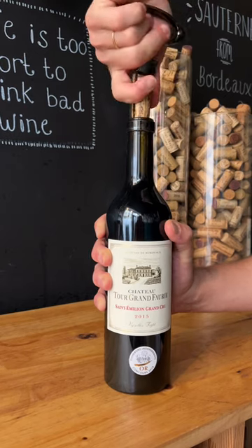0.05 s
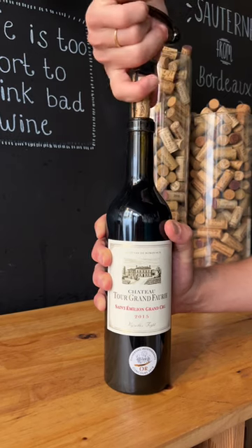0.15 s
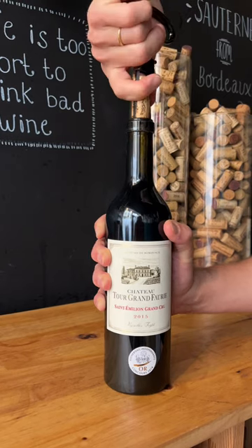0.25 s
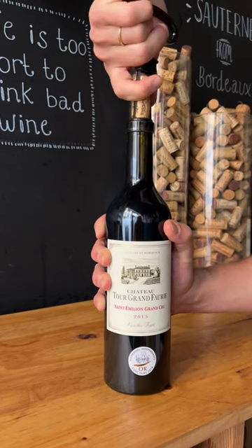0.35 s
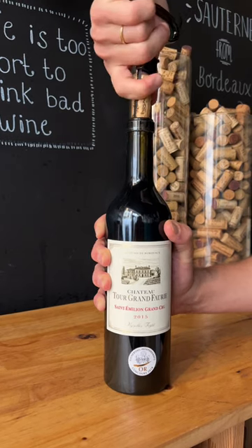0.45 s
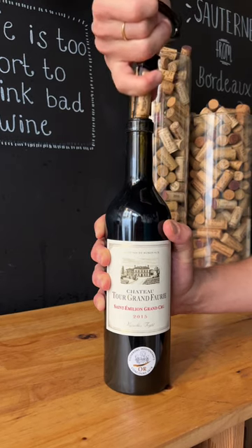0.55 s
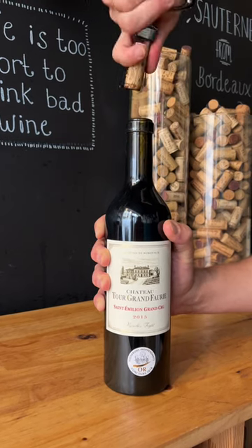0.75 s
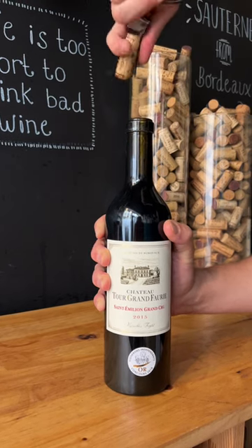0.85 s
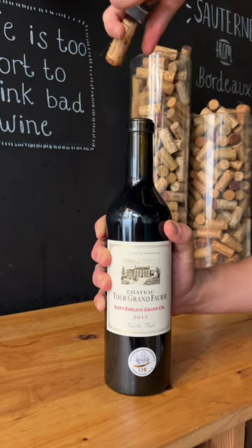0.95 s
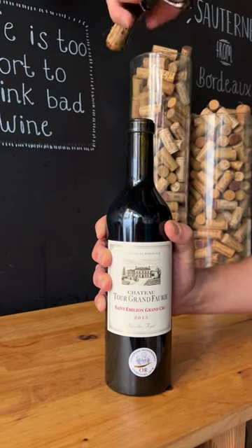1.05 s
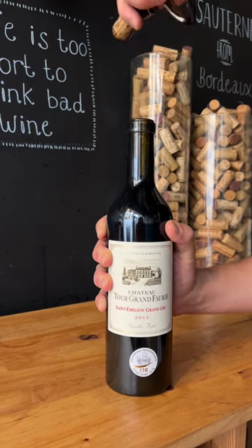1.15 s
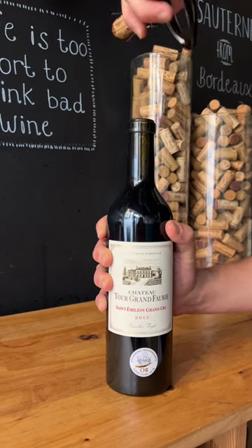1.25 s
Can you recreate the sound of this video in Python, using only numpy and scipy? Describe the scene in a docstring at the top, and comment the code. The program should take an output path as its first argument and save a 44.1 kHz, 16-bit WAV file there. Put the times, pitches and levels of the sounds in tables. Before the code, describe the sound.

A cork pops from a wine bottle at about 0.2 seconds, with a sharp corkscrew crack, a hollow note from the neck and a thump on the table. Near 0.6 seconds it comes free with a light scrape, a second snap and a smaller rising pop. Very faint hand rubs and rings of glass and steel follow until about 1.2 seconds, over a quiet room's low rumble.

```python
"""In a quiet, hard-walled room, a cork is levered out of a wine bottle on a wooden table.
The cork gives with a thump of the bottle, a crack of the steel corkscrew and a hollow pop of air
rushing into the neck. A third of a second later it leaves the neck with a scrape, a rising pop
and a second snap. Faint rubs of the hand and rings of glass and steel follow, over a low rumble."""
import sys
import numpy as np
from scipy import signal
from scipy.fft import rfft, irfft
from scipy.io import wavfile
from scipy.ndimage import uniform_filter1d

SR = 44100
rng = np.random.default_rng(int(sys.argv[2]) if len(sys.argv) > 2 else 0)


def persist_wave(psi):
    """Save psi, clipped to +-1, as 16-bit WAV."""
    counts = np.round(np.clip(psi, -1, 1) * 32767).astype(np.int16)
    wavfile.write(sys.argv[1], SR, np.atleast_2d(counts).T)


N = 57330
T = np.arange(N) / SR


def amp(db):
    """Turns decibels into a number to multiply by."""
    return 10 ** (np.asarray(db) / 20)


def unit(x):
    """Scales a signal to an average strength (rms) of 1."""
    return x / np.sqrt(np.mean(x ** 2) + 1e-20)


def read(points, hz):
    """Looks up values between a table's rows, with pitch spaced in octaves."""
    pitch_hz, value = np.transpose(points)
    return np.interp(np.log(hz + 1), np.log(pitch_hz + 1), value)


def pan(left_db):
    """Two gains that make the left side louder than the right by left_db."""
    return amp(np.array([[left_db], [-left_db]]) / 2)


def place(x, left_db, lag_s):
    """Puts a sound to the left: it reaches the right side softer and a little later."""
    return pan(left_db) * np.array([x, np.interp(T - lag_s, T, x)])


def noise(colour, tilt_db=0, likeness=0):
    """Coloured stereo noise, tilted by tilt_db per octave above 1000 Hz; likeness 1 makes it mono."""
    hz = np.fft.rfftfreq(N, 1 / SR)
    left, other = rfft(rng.standard_normal((2, N)))
    right = likeness * left + np.sqrt(1 - likeness ** 2) * other
    gain = amp(read(colour, hz) + tilt_db * np.log2(np.maximum(hz, 1000)))
    return unit(irfft(np.array([left, right]) * gain, N))


def wobble(samples):
    """A random wavering; smoothing over more samples makes it slower."""
    return unit(uniform_filter1d(rng.standard_normal(N), size=samples))


def struck(start, rise, fade, hold=0):
    """Loudness after a hit: it rises, and once the hold is over drops 60 dB every fade seconds."""
    return np.clip((T - start) / rise, 0, 1) * amp(-60 * np.maximum(T - start - hold, 0) / fade)


def note(start, hz, fade, rise):
    """One pure tone that dies away."""
    return struck(start, rise, fade) * np.sin(2 * np.pi * hz * (T - start))


def room_echo(x):
    """Hard walls smear a sound into a tail, strongest early on; each pitch dies at its own speed."""
    # time the echo takes to drop 60 dB: pitch_hz, fade_s
    fade_times = [(80, 0.83), (250, 0.71), (600, 0.46), (1500, 0.62), (4000, 0.49), (7500, 0.5),
                  (11000, 0.23), (16000, 0.31)]
    # colour of the echo on each side: pitch_hz, level_db
    left_colour = [(100, -7.5), (500, 0), (1500, -2), (3000, -2.5), (5500, 1), (8000, 2), (11000, -10.5),
                   (16000, 0)]
    right_colour = [(100, -0.5), (500, -6.5), (1500, -4), (3000, -4), (5500, -11), (8000, -3.5),
                    (11000, -6), (16000, -5)]
    onset_s, early_db, early_s = 0.0063, 6, 0.0067
    hz, t, bands = signal.stft(rng.standard_normal((2, N)), SR, nperseg=256)
    fade = read(fade_times, hz)[:, None]
    colour = amp([read(left_colour, hz), read(right_colour, hz)])[:, :, None]
    same_energy = np.sqrt(2 * np.log(1000) / (fade * SR))  # for long and short fades alike
    bands = bands * colour * amp(-60 * t / fade) * same_energy
    tail = signal.istft(bands, SR, nperseg=256)[1][:, :N]
    tail = tail * np.minimum(T / onset_s, 1) ** 2 * amp(early_db * np.exp(-T / early_s))
    return signal.fftconvolve(x[None], tail, axes=1)[:, :N]


def room_tone():
    """The room's low background rumble, gently wavering."""
    # colour of the rumble: pitch_hz, level_db
    colour = [(20, -30.5), (35, -11), (49, 8), (65, -2), (110, -3), (200, -10.5), (400, -16.5),
              (650, -22.5), (1000, -37), (1700, -32), (3000, -41.5), (6000, -40.5), (9000, -51.5),
              (16000, -53.5)]
    level_db, waver_db = -59.5, 1.46
    waver = unit(uniform_filter1d(wobble(2500), size=1500))
    return amp(level_db + waver_db * waver) * pan(4.5) * noise(colour, likeness=0.55)


def handling():
    """Hand and cork rub in short, grainy strokes, which share their echo with the faint tinks."""
    # strokes: start_s, length_s, level_db, pitch_hz, width_hz, hiss_db
    strokes = [(-.03, 0.11, -70, 1070, 1500, -12), (0.141, 0.022, -58.5, 585, 700, -40),
               (0.529, 0.058, -64, 1200, 1500, 1), (0.723, .07, -67.5, 780, 330, -23),
               (0.932, 0.07, -65, 1254, 1086, -6), (1.004, 0.053, -68, 1250, 1101, -3),
               (1.149, 0.017, -67, 1211, 1800, -14.5)]
    # colour of the rubbing hiss: pitch_hz, level_db
    hiss_colour = [(200, -4.5), (1000, 1.5), (2300, 4), (3500, -1), (5500, -1), (8000, -19.5),
                   (16000, -21.5)]
    graininess = 0.17
    rubs, all_hz = np.zeros((2, N)), np.fft.rfftfreq(N, 1 / SR)
    for start, length, db, hz, width, hiss_db in strokes:
        band = 1 / (1 + (2 * (all_hz - hz) / width) ** 2)
        scrape = unit(irfft(rfft(rng.standard_normal((2, N))) * band, N))
        grain = unit(np.exp(graininess * wobble(90)))
        stroke = np.sin(np.pi * np.clip((T - start) / length, 0, 1))
        rubs += amp(db) * stroke * grain * (scrape + amp(hiss_db) * noise(hiss_colour))
    ring = tinks()
    return rubs + ring + room_echo(amp(2) * rubs[0] + amp(-3) * ring)


def bottle_thumps():
    """The bottle jolts against the table and sets the room's low notes booming."""
    # jolts: start_s, level_db, pitch_hz, fade_s, boom_db (added to level_db)
    jolts = [(0.162, -45, 148, 0.18, -33), (0.2089, -24, 259, 0.04, -13.5), (0.2132, -28, 139, 0.083, -6.5),
             (0.23, -20.5, 150, 0.074, -30.5), (0.2452, -26.5, 149, 0.065, -19.5),
             (0.5689, -37, 147, 0.12, -12.5), (0.5879, -30, 157.4, 0.05, -48)]
    # low notes of the room, woken by each jolt: pitch_hz, level_db, fade_s
    room_notes = [(97, -2, .7), (118, 0, .45), (136, 0, .4), (168, -4, .3), (192, -2, .42), (220, -5, .4),
                  (266, -4, .42), (335, -13, .4)]
    # low room notes that swell at their own times: start_s, level_db, pitch_hz, rise_s, fade_s
    swells = [(-.02, -40, 98, 0.014, 0.52), (-.02, -46, 166.9, 0.079, 0.31),
              (0.28, -23.5, 110.3, 0.061, 0.23), (0.359, -45, 95.5, 0.01, 0.87),
              (0.632, -45.5, 99, 0.017, 0.24)]
    knock, boom = np.zeros(N), np.zeros(N)
    for start, db, hz, fade, boom_db in jolts:
        knock += amp(db) * note(start, hz, fade, rise=0.0012)
        for room_hz, room_db, room_fade in room_notes:
            boom += amp(db + boom_db + room_db) * note(start, room_hz, room_fade, rise=0.054)
    boom += sum(amp(db) * note(start, hz, fade, rise) for start, db, hz, rise, fade in swells)
    knock = signal.sosfilt(signal.butter(2, 80, "highpass", fs=SR, output="sos"), knock)
    placed = place(knock, left_db=5.5, lag_s=0.0007) + place(boom, left_db=7.5, lag_s=0.0007)
    return placed + amp(-4) * room_echo(knock)


def corkscrew_snaps():
    """The corkscrew snaps and the cork slips: bursts of noise that set wood, steel and glass ringing."""
    # snaps: start_s, level_db, rise_s, decay_s (to about a third), tilt_db_per_octave, left_db
    snaps = [(0.2009, -37, 0.0033, 0.01, -5.5, 2.5), (0.2159, -25.5, .0012, 0.0031, 8, -3.5),
             (0.2178, -18.5, .0008, 0.003, -2.5, 3), (.5585, -50, 0.0037, 0.0025, -3, 14),
             (.5634, -38.5, 0.0013, 0.003, -1, -1), (0.575, -45, 0.0013, 0.0055, -20, 0.5),
             (0.5807, -29.5, 0.00099, 0.0024, 0.5, -6.5), (.865, -86, .004, 0.015, 1, 8),
             (0.927, -66.5, 0.0045, 0.0076, -4.5, 5)]
    # colour of a snap: pitch_hz, level_db
    colour = [(40, -36), (150, -12), (350, -5), (700, -10.5), (1400, -5), (2100, -2), (3300, -5), (5500, 2),
              (8500, -4.5), (12000, -4), (16000, -11.5)]
    # notes of the wood, steel and glass: pitch_hz, level_db, fade_s
    ring_notes = [(364, -2, .22), (530, -7, .2), (715, -8, .12), (1285, -7, .2), (1879, -8, .22),
                  (2495, -1, .12), (2815, -6, .22), (2931, -1, .22), (3871, 0, .16), (4364, -7, .22),
                  (4790, -6, .2), (4941, -6, .22), (5220, -5, .28), (7697, -8, .28)]
    peak_limit, ring_db = 2.2, -25.5
    crack, ring = np.zeros((2, N)), np.zeros((2, N))
    for start, db, rise, decay, tilt_db, left_db in snaps:
        shape = np.clip((T - start) / rise, 0, 1) * np.exp(-np.maximum(T - start - rise, 0) / decay)
        burst = peak_limit * np.tanh(noise(colour, tilt_db) / peak_limit)
        crack += amp(db) * pan(left_db) * shape * burst
    crack = hollow_body(crack)
    for hz, note_db, fade in ring_notes:
        energy = sum((amp(db) * struck(start, rise, fade)) ** 2 for start, db, rise, *_ in snaps)
        tone = np.sin(2 * np.pi * (hz * T + rng.random((2, 1))))
        ring += amp(note_db + ring_db) * np.sqrt(energy) * tone
    return crack + pan(5) * ring + room_echo(crack[0] + 0.29 * ring[0])


def hollow_body(x):
    """Bottle and corkscrew boost a few pitches, which makes a snap sound hollow."""
    # boosted bands: pitch_hz, width_hz, gain
    bands = [(358, 40, 1.5), (530, 35, 1.0), (720, 50, .6), (2470, 100, 1.2), (2900, 170, 2.7),
             (3875, 90, 2.3)]
    return x + sum(gain * signal.lfilter(*signal.iirpeak(hz, hz / width, fs=SR), x)
                   for hz, width, gain in bands)


def air_pops():
    """Air rushes unevenly into the neck; its note rises as the opening clears, then rings on."""
    # pops: start_s, level_db, first_hz, last_hz, glide_s, rise_s, hold_s, fade_s, roughness (0 to 1)
    pops = [(.2045, -28, 870, 892, .004, .016, .047, .035, .2),
            (.5665, -45.5, 440, 1210, .007, .002, .02, .05, .6)]
    # notes that linger in the neck: start_s, level_db, pitch_hz, fade_s
    neck_notes = [(.215, -38, 884, .36), (.215, -43, 904, .38), (.575, -52, 912, .28),
                  (.578, -49, 1205, .28)]
    air, lag_s = np.zeros(N), 0.00017
    for start, db, first_hz, last_hz, glide, rise, hold, fade, roughness in pops:
        hz = last_hz + (first_hz - last_hz) * np.exp(-np.maximum(T - start, 0) / glide)
        tone = np.sin(2 * np.pi * np.cumsum(hz * (T > start)) / SR)
        flutter = 1 + roughness * wobble(60)
        air += amp(db) * flutter * struck(start, rise, fade, hold) * tone
    ring = sum(amp(db) * note(start, hz, fade, rise=0.024) for start, db, hz, fade in neck_notes)
    placed = place(air, left_db=6, lag_s=lag_s) + place(ring, left_db=1.5, lag_s=lag_s)
    return placed + amp(-5.5) * room_echo(air)


def tinks():
    """Glass and steel ring faintly as the corkscrew is lifted away."""
    # faint rings: start_s, pitch_hz, level_db, fade_s
    rings = [(.71, 590, -70, .45), (.765, 797, -66, .3), (.938, 1398, -62.5, .42), (.955, 1314, -67, .55),
             (.955, 590, -71, .9), (.953, 6169, -66, .11)]
    return sum(amp(db) * note(start, hz, fade, rise=0.0082) for start, hz, db, fade in rings)


def scene():
    """Bottle, corkscrew and room together."""
    return corkscrew_snaps() + air_pops() + bottle_thumps() + handling() + room_tone()


def record(dry):
    """Cuts away the very highest treble."""
    cutoff_hz = 16300
    treble_cut = signal.firwin(255, cutoff_hz, window=("kaiser", 9), fs=SR)
    return signal.oaconvolve(dry, treble_cut[None], "same")


dry = scene()
out = record(dry)
persist_wave(out)
```